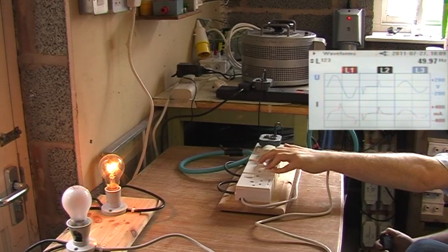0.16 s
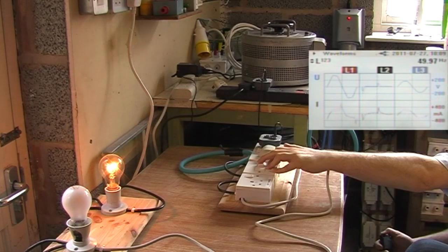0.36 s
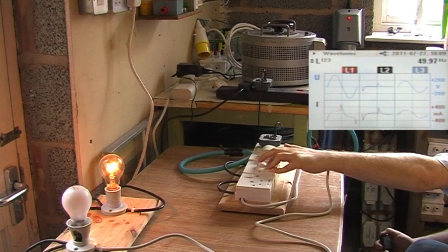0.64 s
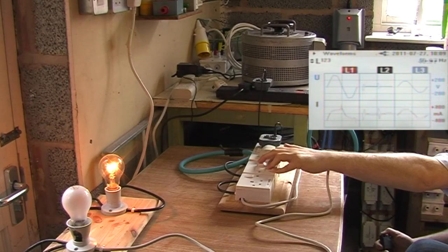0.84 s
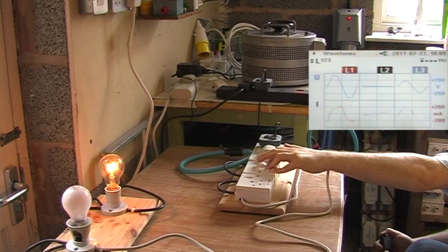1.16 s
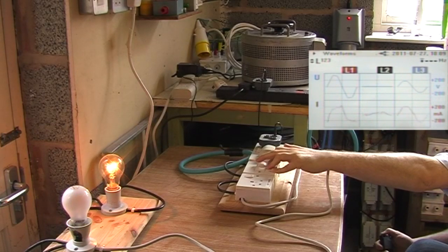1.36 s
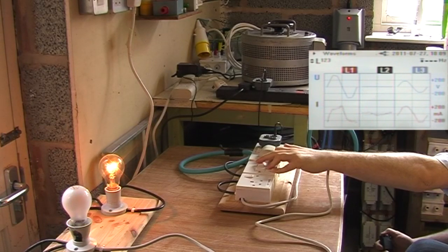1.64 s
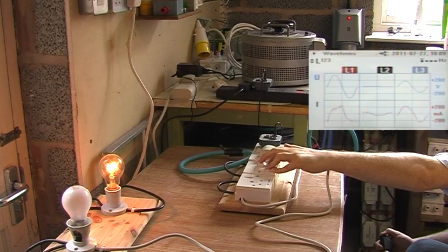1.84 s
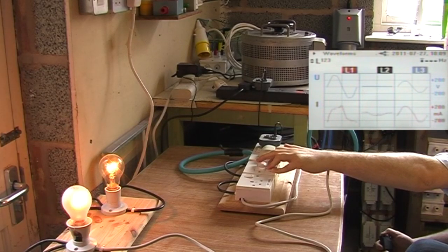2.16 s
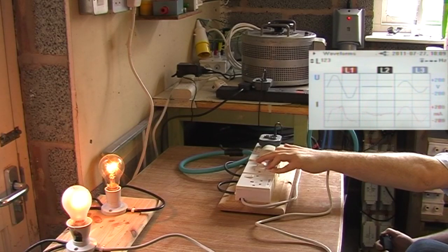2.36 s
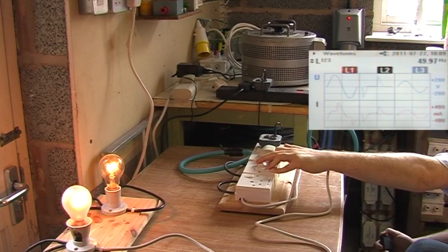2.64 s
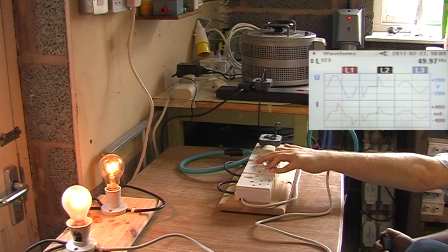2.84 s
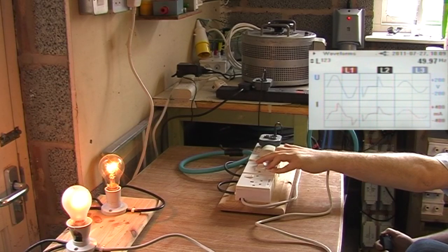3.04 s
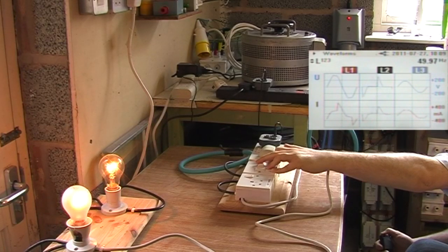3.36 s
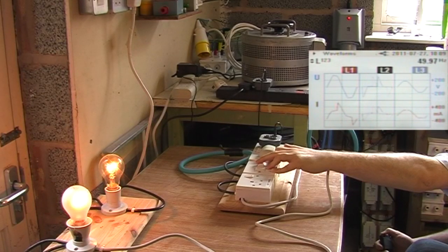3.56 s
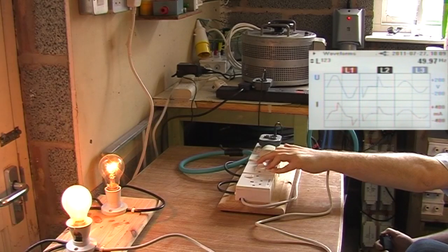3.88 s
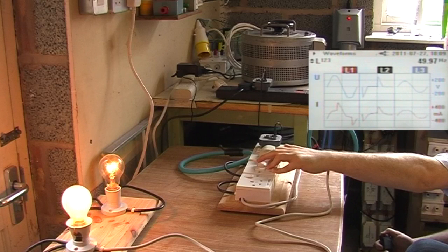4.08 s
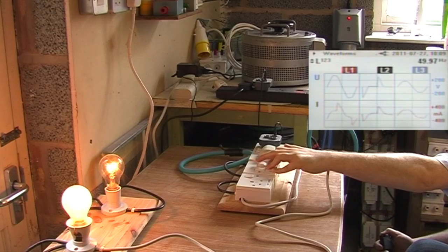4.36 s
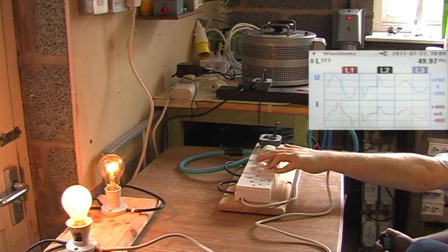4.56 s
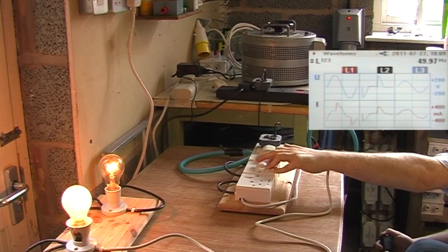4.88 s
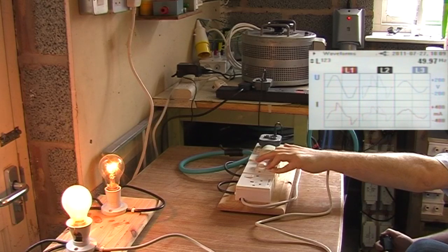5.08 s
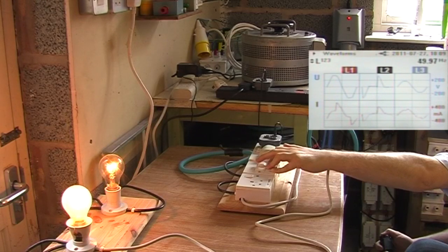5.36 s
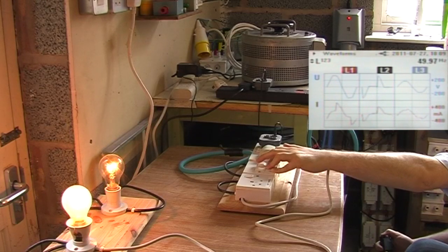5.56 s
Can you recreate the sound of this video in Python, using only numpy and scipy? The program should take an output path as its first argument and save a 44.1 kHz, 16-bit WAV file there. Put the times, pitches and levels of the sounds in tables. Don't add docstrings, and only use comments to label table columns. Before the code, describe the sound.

A small cooling fan drones steadily with a low hum and airy rush in a workshop, with faint camcorder whine throughout.

```python
import sys
import numpy as np
from scipy import signal
from scipy.fft import rfft, irfft, next_fast_len
from scipy.io import wavfile

SR = 44100
rng = np.random.default_rng(int(sys.argv[2]) if len(sys.argv) > 2 else 0)


def invert_db(x):
    u = np.asarray(x, float) / 20
    return 10 ** u


def wav_out(sig):
    wavfile.write(sys.argv[1], SR, np.round(np.clip(np.atleast_2d(sig).T, -1, 1) * 32767).astype(np.int16))


N = 252252

DRUM_HZ = 150
# (time [s], level [dB])
TRAFFIC = [(0.0, -69), (0.41, -58), (0.89, -63.5), (2.98, -59.5), (3.12, -66), (3.41, -60), (4.46, -57.5),
           (4.62, -71), (4.83, -58), (5.13, -75), (5.29, -58.5), (5.72, -55.5)]


def at_hz(points, hz, column=1):
    points = np.array(points)
    return np.interp(np.log(hz), np.log(points[:, 0]), points[:, column])


def drift(rate_hz):
    coarse, settle = 40, 2000
    pole = np.exp(-2 * np.pi * rate_hz * coarse / SR)
    noise = rng.standard_normal(N // coarse + settle + 2)
    slow = signal.lfilter([1], [1, -2 * pole, pole * pole], noise)[settle:]
    return np.interp(np.arange(N) / coarse, np.arange(len(slow)), slow / np.std(slow))


def swing_db(rows):
    db = np.interp(np.arange(N) / SR, *np.transpose(rows))
    return db - db.mean()


def cycles(hz):
    return 2 * np.pi * hz * np.arange(N) / SR


def tone(phase, level_db, side_db, lead):
    height = np.sqrt(2) * invert_db(level_db)
    return height * np.array([np.sin(phase), invert_db(side_db) * np.sin(phase + lead)])


def bumps_db(modes, hz):
    return sum(db * 2 ** (-4 * ((hz - centre) / width) ** 2) for centre, width, db in modes)


def steady_lines(rows, shake_db, wobble, gain_db, count):
    size, out = next_fast_len(N), 0
    hz, db, side_db = np.transpose(rows)
    start, lead = np.exp(2j * np.pi * rng.random((len(rows), 2))).T
    mid = np.sqrt(2) * size * invert_db(db + gain_db) * start
    side = mid * invert_db(side_db) * lead
    bins = np.round(hz * size / SR).astype(int)
    for k in range(count):
        group = slice(k, None, count)
        spectrum = np.zeros((2, size), complex)
        spectrum[:, bins[group]] = [mid[group], side[group]]
        sway = invert_db(shake_db * drift(1.4)) * np.exp(1j * wobble * drift(2.5))
        out = out + (np.fft.ifft(spectrum)[:, :N] * sway).real
    return out


def blades():
    # (time [s], level [dB])
    gusts = [(0.0, -39), (0.08, -37.5), (0.83, -37), (0.97, -40), (1.1, -36.5), (1.27, -38.5), (1.32, -40),
             (1.59, -36), (1.74, -39), (1.77, -35.5), (2.13, -41.5), (2.24, -34.5), (2.42, -38),
             (3.28, -38), (3.68, -35), (3.71, -37.5), (5.67, -38.5), (5.72, -39)]
    # (multiple, level against the first [dB], side minus mid [dB], side lead [rad])
    harmonics = [
        (1, 2, -25, -2.1),
        (2, -10.5, -14.5, 3.5),
        (3, -7, -10, 0.8),
        (4, -18.5, -10, .1),
        (5, -20, -21, -2),
        (6, -27.5, -4, -3.5),
        (9, -38, 0, 3),
    ]
    blade_hz, first_db = 225.8, -39.5
    turn = cycles(blade_hz) + .15 * drift(1.5)
    sway_db = {1: 1.11 * swing_db(gusts), 3: 0.9 * drift(1.25)}
    out = 0
    for k, db, side_db, lead in harmonics:
        turbulence_db = .3 * np.sqrt(k) * drift(5.0)
        level_db = first_db + db + sway_db.get(k, 0) + turbulence_db
        wobble = 0.087 * drift(2.5)
        out = out + tone(k * turn + wobble + rng.uniform(0, 2 * np.pi), level_db, side_db, lead)
    return out


def motor():
    # (frequency [Hz], level [dB], side minus mid [dB])
    lines = [(46.4, -71, -11), (99.9, -65, -14), (280.7, -58, -22), (290.4, -60, -25), (299.9, -58, -25),
             (487.1, -52, -19), (587.0, -50, -28), (687.0, -55, -14), (799.6, -63, -25), (966.0, -58, -17),
             (1699.2, -66, -18), (1766.0, -71, -7), (1904.2, -75, 3), (1953.2, -68, -9), (1959.3, -64, -8),
             (2152.6, -74, -2), (2173.6, -72, -8), (2290.6, -63, -9), (2345.6, -73, -15),
             (2709.6, -73, -13), (2897.7, -64, -11), (3090.9, -72, -2), (3477.0, -75, -17),
             (3643.0, -75, -7), (4250.0, -73, -4), (4292.2, -71, -12), (4347.3, -73, -20),
             (5255.1, -72, -22), (6079.7, -80, -16)]
    return steady_lines(lines, shake_db=.8, wobble=.25, gain_db=.2, count=6)


def frame():
    # (frequency [Hz], level [dB], side minus mid [dB])
    lines = [(149.4, -78, -2), (166.9, -62, -23), (440.1, -61, -15), (1158.8, -67, -22), (1445.4, -68, -17),
             (1580.0, -67, -11), (1733.4, -75, -10), (1815.5, -73, -19), (1862.6, -71, -15),
             (1870.7, -71, -11), (1994.5, -84, 6), (2096.8, -87, 5), (2924.5, -73, -12), (2971.6, -78, -16),
             (3053.7, -78, -6), (3283.8, -78, -10), (3769.7, -78, -7), (3851.8, -77, -17), (3900.2, -91, 2),
             (4429.1, -75, -9), (4869.2, -85, -3), (5536.7, -78, -15), (6181.4, -80, -17)]
    return steady_lines(lines, shake_db=1.0, wobble=0.37, gain_db=1.5, count=4)


def bearing_whistle():
    phase = cycles(4443.6) + 0.49 * drift(1.7)
    level_db = -64 + np.interp(np.arange(N) / SR, (2.3, 4.3), [0, -7])
    return tone(phase, level_db, side_db=-27, lead=1.2)


def gear_rows():
    multiples = [70, 71, 73, 74, 75, 76, 82, 83, 86, 89, 91, 92, 94, 95, 127, 132]
    # (frequency [Hz], mid level [dB], side level [dB])
    chassis = [
        (7300, -91, -88),
        (8400, -111, -83),
        (9400, -100, -85),
        (13200, -93, -81),
    ]
    hz = 101.8 * np.array(multiples)
    mid_db = at_hz(chassis, hz)
    side_db = at_hz(chassis, hz, column=2)
    return list(zip(hz, mid_db, side_db - mid_db))


def tape_transport():
    # (frequency [Hz], level [dB], side minus mid [dB])
    whine = [(6530.2, -86, -11), (6577.0, -88, -4), (7334.8, -89, -1), (7381.9, -89, -2), (7775.0, -88, 3),
             (7866.3, -99, 11), (8048.0, -96, 8), (8227.3, -85, 5), (8613.3, -88, -10), (8667.5, -82, 5),
             (8712.9, -87, -2), (9153.0, -100, 16), (9824.2, -94, 11), (9919.4, -92, 11), (9969.4, -90, 11),
             (10029.1, -99, 12), (10124.6, -99, 13), (10159.6, -100, 12), (10438.2, -96, 6),
             (12627.9, -92, -2), (13024.9, -95, 5), (13137.2, -90, 3), (13228.1, -92, 2), (14362.4, -95, 5)]
    return steady_lines(list(whine) + gear_rows(), shake_db=1.0, wobble=.3, gain_db=1.2, count=4)


def head_drum():
    # (multiple of the drum turn, level [dB], side minus mid [dB])
    multiples = [(15, -72, -7), (16, -86, 8), (38, -77, -9), (42, -80, -6), (44, -88, 2), (46, -90, 7),
                 (48, -92, 5), (51, -85, -5), (52, -96, 10), (53, -90, 8), (54, -88, 9), (56, -89, 3),
                 (58, -99, 17), (60, -95, 10), (62, -100, 19), (70, -89, 10), (68, -92, 3), (72, -87, 5),
                 (74, -83, 5), (76, -91, 4), (78, -91, 1), (82, -86, -8), (84, -86, -4), (86, -80, -2),
                 (88, -82, 2), (73, -93, 1), (90, -81, 3), (92, -85, 4), (94, -93, 8), (96, -86, -6)]
    lines = [(k * DRUM_HZ, db, side_db) for k, db, side_db in multiples]
    return steady_lines(lines, shake_db=.3, wobble=.1, gain_db=1.5, count=2)


def drum_comb_db(hz):
    # (frequency [Hz], notch depth [dB])
    depths = [
        (600, -14),
        (1200, -7.5),
        (2400, -7),
        (3000, -6),
        (5100, -7.5),
        (5800, -1),
    ]
    notches = 2 * DRUM_HZ * np.arange(2, 21)
    third_share = np.where(notches % (6 * DRUM_HZ) == 0, 0.28, 1)
    depth_db = at_hz(depths, notches) * third_share
    return sum(db / (1 + ((hz - notch) / 22) ** 2) for notch, db in zip(notches, depth_db))


def rush():
    # (frequency [Hz], density [dB per Hz])
    mid_air = [(20, -108.5), (40, -89), (70, -80), (130, -72), (200, -70), (350, -65), (500, -69.5),
               (800, -70.5), (1300, -81.5), (2500, -84.5), (5300, -86), (6800, -100.3), (12500, -101.2),
               (14400, -106.7)]
    side_air = [(20, -111.0), (40, -93), (70, -92), (130, -83.5), (200, -80.5), (350, -89.5), (500, -84),
                (800, -89), (1300, -91.9), (2500, -91.5), (5300, -98.5), (6800, -103.3), (12500, -106.7),
                (14400, -107.7)]
    # (frequency [Hz], width [Hz], level [dB])
    mid_room = [(32, 6, -7), (58, 10, -4), (88, 6.1, -1), (140.7, 49, -10), (174.4, 16, 5.5),
                (193, 6.4, -5), (217, 43, 5), (287, 11, -1), (336, 10, 10.5), (337, 77, -13.5),
                (419.6, 19, 5), (511.6, 41, 12.5), (580.5, 34, 7.5), (640, 14, -1), (670, 22, -2.5),
                (825, 68, -8.5), (1009, 63, -5), (1150, 57, 4), (1540, 144, 9), (1603, 54, -5),
                (1690, 31, 5.5), (1920, 95, 3.5), (2260, 36, 5.5), (3130, 290, 3), (3080, 130, -5.5),
                (3690, 110, -7), (4240, 800, 1), (4750, 280, -2)]
    side_room = [(33, 6, -2), (148, 47, -9), (306, 22, 1), (417, 26, 3.4), (621, 29, 7), (676, 28, 14),
                 (1547, 273, 4), (1950, 95, 6), (8904, 2200, 8), (10077, 512, 5), (12000, 500, -3),
                 (13199, 857, 4), (15106, 1281, -10.9)]
    bench = [(433, 10, -2.6), (460, 10, 3.2), (856, 10, 4.2), (929, 10, -4.2), (1287, 60, 1.5),
             (1381, 40, -2.6), (1437, 25, 3.6), (1462, 10, -5.8), (1537, 16, -3.5), (1623, 10, 3.8),
             (1709, 16, 3.4), (2019, 16, -3.7), (2143, 25, -2.9), (2229, 16, -4.2), (2361, 16, -4.4),
             (2431, 16, 3.8), (2608, 16, -4.9), (2867, 40, -3.6), (2915, 25, 3.2), (3241, 25, -5.6),
             (3499, 40, -5.0), (3569, 25, -3.3), (3634, 25, 3.9), (3935, 25, -3.4), (4040, 25, 3.7),
             (4404, 40, -2.9), (5558, 40, -3.1), (6185, 40, 3.8)]
    # (frequency [Hz], in-step share [1], quarter-cycle share [1])
    coherence = [(30, .3, .6), (70, 0.02, .6), (200, -.3, .3), (500, 0.086, 0.33), (1000, -0.19, .3),
                 (2000, -0.31, .3), (4000, -0.38, .3), (8000, 0.0042, .2), (13000, 0.44, .3)]
    size = next_fast_len(N)
    hz = np.maximum(np.arange(size // 2 + 1) * SR / size, 1)
    comb_db = drum_comb_db(hz)
    mid_gain = invert_db(at_hz(mid_air, hz) + bumps_db(mid_room, hz) + bumps_db(bench, hz) + comb_db)
    side_gain = invert_db(at_hz(side_air, hz) + bumps_db(side_room, hz) + .6 * comb_db)
    one, other = rfft(rng.standard_normal((2, size))) * np.sqrt(SR / 2)
    in_step = np.clip(at_hz(coherence, hz), -.7, .7)
    quarter = np.clip(at_hz(coherence, hz, column=2), -.7, .7)
    link = in_step + 1j * quarter
    linked = link * one + np.sqrt(1 - abs(link) ** 2) * other
    both = np.array([mid_gain * one, side_gain * linked])
    low = 1 / (1 + (hz / 90) ** 8)
    air = irfft(both * (1 - low), size)[:, :N] * invert_db(0.36 * drift(2.0))
    rumble = irfft(both * low, size)[:, :N] * invert_db(.9 * swing_db(TRAFFIC))
    return air + rumble


def traffic_drone():
    phase = cycles(77) + 1.0 * drift(1.6)
    return tone(phase, -66 + 1.05 * swing_db(TRAFFIC), side_db=-16, lead=1.2)


def thud():
    t = np.arange(N) / SR - 5.55
    envelope = np.exp(-(t / .1) ** 2)
    return envelope * tone(2 * np.pi * 50 * t, -58, side_db=-14, lead=1.2)


def scene():
    fan = blades() + motor() + frame() + bearing_whistle()
    camcorder = tape_transport() + head_drum()
    mid, side = fan + camcorder + rush() + traffic_drone() + thud()
    return np.array([mid + side, mid - side])


def band_limit(x):
    return signal.sosfilt(signal.butter(12, 15220, fs=SR, output="sos"), x)


def record(dry):
    tape_top = signal.cheby2(12, 13, 14560, fs=SR, output="sos")
    return band_limit(signal.sosfilt(tape_top, dry))


dry = scene()
out = record(dry)
wav_out(out)
```